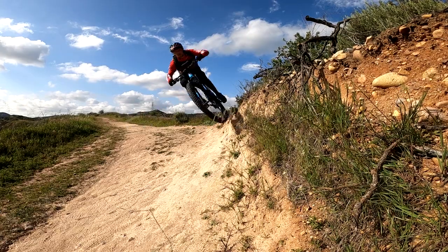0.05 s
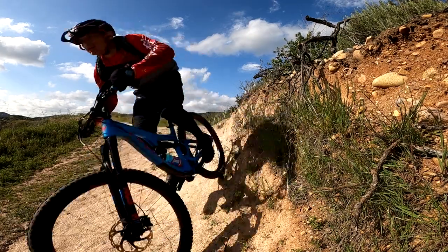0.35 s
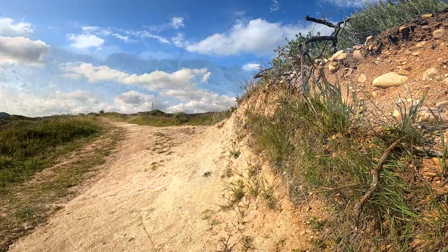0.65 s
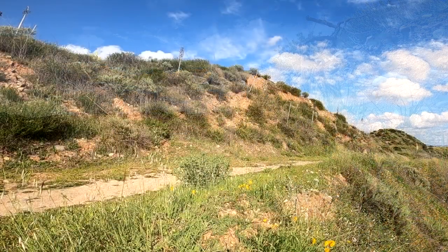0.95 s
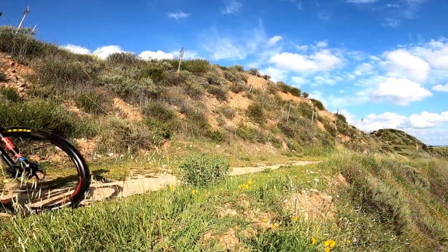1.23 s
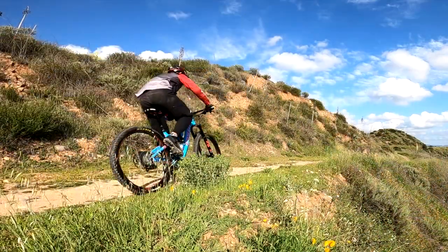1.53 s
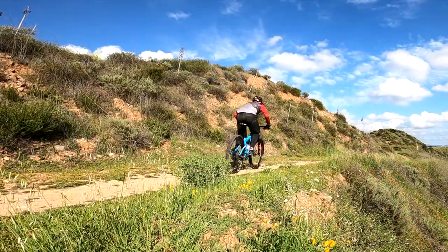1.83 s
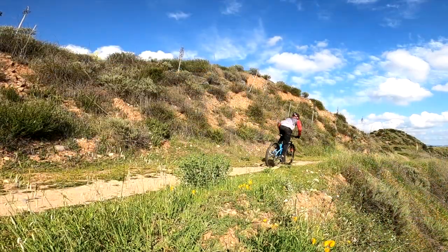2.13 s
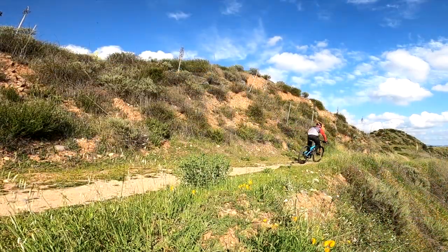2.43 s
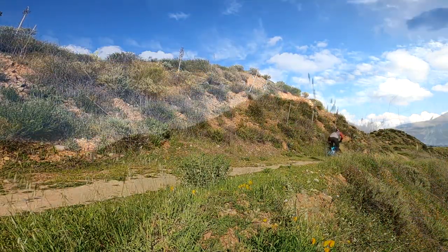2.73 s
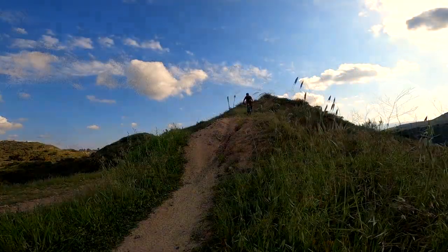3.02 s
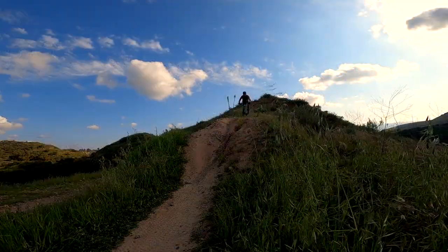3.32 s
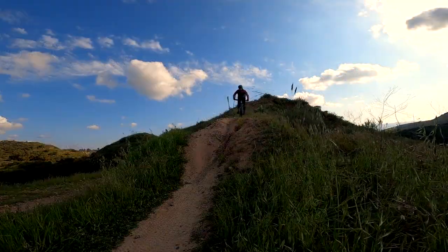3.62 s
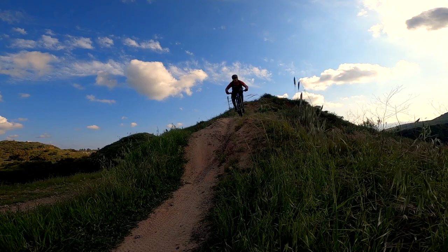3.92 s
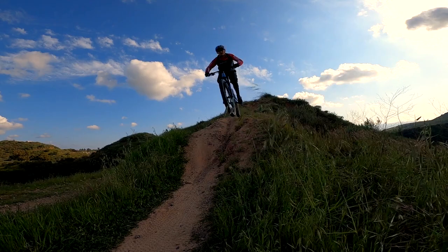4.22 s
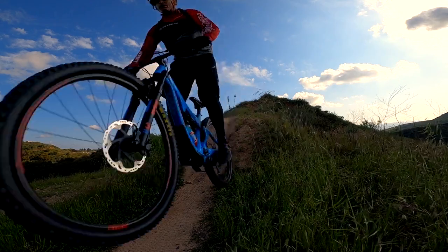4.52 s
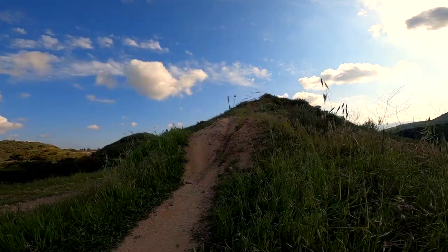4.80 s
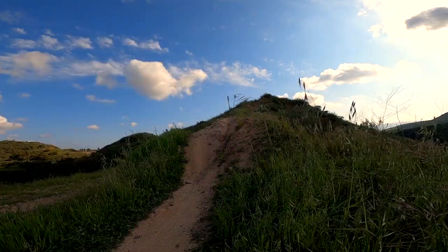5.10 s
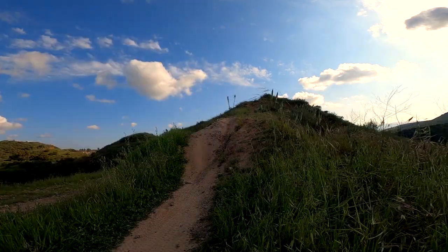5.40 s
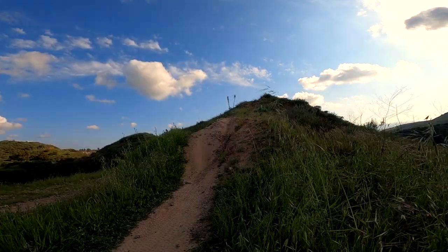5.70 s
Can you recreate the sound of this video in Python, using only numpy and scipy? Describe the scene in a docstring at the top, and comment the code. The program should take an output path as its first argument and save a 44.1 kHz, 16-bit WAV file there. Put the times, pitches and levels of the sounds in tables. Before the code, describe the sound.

Bike tyres rumble and crunch over dry dirt in three close passes, two thumping down from jumps, as wind buffets the microphone.

```python
"""A dry dirt trail in open hills: mountain bikes pass close by three times. Two jump and land
beside the microphone, one rolls past. Knobby tyres rumble and crush grit, swelling as they near,
lighter in hops and harder on bumps, with a bright whirr and a wavering low hum. Landings thump,
stones snap, hard jolts clink and slipping knobs spray dirt. Wind buffets the microphone, mostly
while the last rider is still far away."""
import sys
import numpy as np
from scipy import signal
from scipy.io import wavfile
from scipy.ndimage import uniform_filter1d, map_coordinates

SR = 44100
rng = np.random.default_rng(int(sys.argv[2]) if len(sys.argv) > 2 else 0)


def digitize_waveform(pressure):
    """Quantize a signal to 16-bit integers and store it at the path in sys.argv[1].

    Rows of a 2-D input are taken as channels; values are limited to [-1, 1].
    """
    field = np.atleast_2d(pressure).T
    bounded = np.clip(field, -1, 1)
    quanta = np.round(bounded * 32767).astype(np.int16)
    wavfile.write(sys.argv[1], SR, quanta)


N = 253575
TIME = np.arange(N) / SR
SIDES = np.array([[1], [-1]])  # left, right
METAL_CYCLES = 124  # a metallic ring dies by 60 dB in this many cycles
LAYERS = ("crunch", "dust", "rumble", "roar", "whirr")

# Pass-bys: start t/s, closest t/s, distance/m, then closest level/dB for each of LAYERS
PASSES = [(0, 0.56, 0.46, -27, -34.5, -22, -25.5, -58), (0.872, 1.25, 1.54, -37, -44.5, -36, -39.5, -41),
          (2.896, 4.765, 0.33, -22.5, -28.5, -19, -16, -34.5)]
# The bike's stereo position: t/s, left over right/dB, width/0-1
PAN_PATH = [(0.68, 3, 0.36), (.86, 9.5, 0.73), (1.25, 11.5, 0.4), (1.48, 6.5, 0.4), (1.8, 1.1, 0.29),
            (3.5, -1, 0.46), (4.2, 0, 0)]
# Brief dips in the tyre sound, in hops or under a wind buffet: start t/s, end t/s, dip/dB
DIPS = [(-0.05, 0.341, 16.5), (0.37, 0.478, 15), (0.731, 0.89, 3.5), (2.48, 2.883, 2), (3.062, 3.392, 1.5),
        (3.52, 3.87, 3.5), (4.242, 4.624, 10), (4.62, 4.73, 2.5), (5.234, 5.428, 10)]
# Landings and rough ground load the tyres: t/s, crunch boost/dB, drumming boost/dB, length/s
BUMPS = [(0.499, 7, -6, 0.023), (0.662, 3.5, 2.5, 0.066), (1.185, -3, 8, 0.13), (1.31, -2, 9, 0.18),
         (1.505, 7.5, 8.5, 0.11), (1.68, 8, 5, 0.19), (2.182, 7, 2.5, 0.6), (2.903, -1, 4.5, 0.26),
         (3.385, 2.5, -0.5, 0.17), (4.615, 6.5, 7.5, 0.057), (4.938, -7.5, 2.5, 0.57), (5.66, 0, 6.5, 0.59)]

# Tone curve of the hill air: f/Hz, level/dB
AIR_EQ = [(25, 8), (420, -4), (800, -30.5), (2000, -23), (7000, -29.5), (10000, -47), (15000, -67)]
# Tone curve of crushed grit: f/Hz, level/dB
GRIT_EQ = [(500, -3), (1300, 4.5), (2200, 2), (3300, -3), (4500, -15.5), (6000, -26.5), (9000, -46.5)]
# Tone curve of fine dust: f/Hz, level/dB
DUST_EQ = [(3100, 6), (4200, 6), (5700, 1), (7200, -4.5), (9100, -16), (11500, -20), (14500, -26.5)]
# Tone curve of the tyres' low end: f/Hz, level/dB
RUMBLE_EQ = [(20, -7), (40, -5), (80, 0), (130, -5.5), (190, -4), (370, -28)]
# Tone curve of the tread's hollow roar: f/Hz, level/dB
ROAR_EQ = [(130, -23.5), (180, -4.5), (290, 2.5), (380, -1), (480, 0), (650, -5), (900, -9.5),
           (2300, -23.5)]
# Tone curve of the gusts: f/Hz, level/dB
GUST_EQ = [(18, 5), (35, 5.5), (70, 2.5), (200, -11.5), (340, -43), (900, -76.5)]

# Swells and fades of the low hum: t/s, level/dB
HUM_LEVEL = [(0, -42.5), (0.25, -69), (0.4, -33.5), (0.56, -37), (0.83, -36.5), (0.92, -44), (1.33, -35),
             (1.5, -45.5), (2.8, -54.5), (3, -40.5), (4.1, -40.5), (4.5, -48), (4.9, -26), (5.13, -37),
             (5.23, -31), (5.35, -41), (5.75, -33.5)]
# Pitch glide of that hum: t/s, f/Hz
HUM_PITCH = [(0.48, 266), (0.6, 246), (0.77, 296), (0.84, 256), (1.02, 296), (1.12, 252), (1.32, 294),
             (1.65, 258), (5.25, 251)]
# The two bright bands of the whirr: f/Hz, bandwidth/Hz, level/dB
WHIRR_BANDS = [(2830, 1000, -0.5), (7000, 730, -7)]
# Single eddies on the microphone: peak t/s, level/dB, cutoff f/Hz, length/s
EDDIES = [(0.294, -27, 108, 0.032), (1.858, -28.5, 70.5, 0.05), (3.201, -14, 152, 0.049),
          (3.412, -9.5, 133, 0.025), (3.496, -12.5, 222, 0.063), (3.605, -10, 304, 0.022),
          (3.699, -6.5, 416, 0.03), (3.947, -14, 234, 0.049)]
# Gusts on the microphone: peak t/s, level/dB, length/s
GUSTS = [(3.569, -17, 0.75), (4.318, -21.5, 0.17), (5.137, -30, 0.076)]
# Sudden bursts of grit: knobs tearing dirt loose up close, and dull scuffs and knocks of the bike still far
# off: peak t/s, level/dB, brightness f/Hz, length/s
SPRAYS = [(0.366, -37, 1540, 0.085), (0.513, -28, 6000, 0.055), (0.667, -31, 5500, 0.014),
          (0.695, -22, 6000, 0.0064), (0.812, -30.5, 2600, 0.03), (0.881, -32.5, 2840, 0.023),
          (1.203, -31.5, 2300, 0.058), (2.211, -36, 2570, 0.047), (2.299, -44, 2800, 0.14),
          (2.824, -46, 2900, 0.027), (3.044, -36, 1050, 0.036), (3.233, -37, 1200, 0.039),
          (3.338, -36.5, 1560, 0.014), (3.39, -36, 1170, 0.034), (3.462, -41.5, 1000, 0.33),
          (4.162, -48.5, 2800, 0.31), (4.676, -18.5, 5140, 0.01), (4.739, -21.5, 4860, 0.048),
          (4.758, -16, 2940, 0.027)]
# Wheels hitting the ground: t/s, thump drive/dB, crack drive/dB
LANDINGS = [(0.474, -17, -28), (0.51, -8, -13), (4.616, -11, -7), (4.718, -3.5, 0), (4.791, -15, -19)]
# Tyre and ground ringing after a blow: f/Hz, level/dB, t60/s
THUMP_MODES = [(67, 6, 0.071), (131, -5.5, 0.044), (291, -2.5, 0.044), (432, -3, 0.032)]
# Stones, chain and suspension knocking on the bike: t/s, level/dB, f/Hz
CLACKS = [(0.691, -15, 4200), (0.6965, -9.5, 2200), (0.7137, -12.5, 1700), (1.2653, -11, 1800),
          (1.3488, -14, 3060), (1.4655, -14, 2380), (1.4717, -14, 2370), (1.5005, -19, 3900),
          (1.5377, -14.5, 1780), (1.732, -18, 1410), (2.184, -31, 2580), (2.992, -28, 740),
          (3.443, -26.5, 860), (3.997, -23.5, 2300), (4.6268, -11, 2600), (4.719, -4.5, 1590),
          (4.7643, -5.5, 1860), (4.796, -7, 370), (5.389, -24.5, 380), (5.4333, -32, 1111)]
# Short, bright ringing clinks on hard jolts: t/s, level/dB, f/Hz
CLINKS = [(0.691, -21.5, 7280), (2.803, -48, 10660), (4.644, -14, 3120), (4.6764, -27, 7300),
          (4.677, -18.5, 2560)]


def from_db(db):
    """Decibels to gain."""
    return 10 ** (np.asarray(db) / 20)


def rms_one(x):
    """Scale to unit power."""
    return x / np.sqrt(np.mean(x ** 2) + 1e-20)


def automation(rows):
    """Each column of a timed curve at every sample."""
    times, *columns = np.transpose(rows)
    return [np.interp(TIME, times, column) for column in columns]


def butter(x, hz, kind, order=2):
    """Causal Butterworth filter."""
    sections = signal.butter(order, np.clip(hz, 10, .45 * SR), kind, fs=SR, output="sos")
    return signal.sosfilt(sections, x + 1e-18)


def white():
    """A pair of unrelated white noises."""
    return rng.standard_normal((2, N))


def drift(hz):
    """A smooth random wobble, rms about 1."""
    step = 40  # samples per control point
    pole = np.exp(-2 * np.pi * hz * step / SR)
    noise = rng.standard_normal(N // step + 2002)
    slow = signal.lfilter([1], [1, -2 * pole, pole * pole], noise)[2000:]
    return np.interp(np.arange(N) / step, np.arange(len(slow)), rms_one(slow))


def steady(x, samples):
    """Ride the level flat over a window and keep the finer texture."""
    power = np.atleast_2d(x ** 2).mean(0)
    smooth = uniform_filter1d(uniform_filter1d(power, samples), samples)
    return x / np.sqrt(np.abs(smooth) + 1e-12)


def ring(x, hz, t60):
    """A resonator: a unit click starts a decaying sine of height 1."""
    pole, angle = from_db(-60 / (t60 * SR)), 2 * np.pi * hz / SR
    feedback = [1, -2 * pole * np.cos(angle), pole * pole]
    return signal.lfilter([0, pole * np.sin(angle)], feedback, x + 1e-18)


def bell(peak_s, length, lean=1):
    """A smooth rise to 1 and a fall; lean is rise time over fall time."""
    width = length * np.where(TIME < peak_s, lean, 1)
    return np.exp(-np.minimum((2 * (TIME - peak_s) / width) ** 2, 50))


def swell(noise, peak_s, length, lean=1):
    """A burst of the noise with rms 1 at its height."""
    shape = bell(peak_s, length, lean)
    power = np.sum(np.mean(noise ** 2, 0) * shape ** 2) / np.sum(shape ** 2)
    return noise * shape / np.sqrt(power)


def coloured(eq, excite):
    """Third-octave bands on a tone curve, each driven by a fresh call of excite; rms 1."""
    hz, db = np.transpose(eq)
    edges = 16 * 2 ** (np.arange(31) / 3)
    out = 0
    for low, high in zip(edges, edges[1:]):
        centre = np.sqrt(low * high)
        if hz[0] <= centre <= hz[-1]:
            gain = from_db(np.interp(np.log(centre), np.log(hz), db))
            out = out + gain * butter(excite(), [low, high], "band", order=3)
    return rms_one(out)


def scatter(per_s, size_db, cap=np.pi):
    """Random clicks, many small and a few big, spanning cap times size_db."""
    hits = rng.random(N) < per_s / SR
    return hits * from_db(size_db * np.minimum(rng.exponential(1, N), cap))


def panned(pair, spread=1, lag_s=0.00014):
    """Mid and side to left and right, following the bike in level and, off centre, in delay."""
    mid, side = pair
    pan_db, width = automation(PAN_PATH)
    width = spread * np.clip(width, 0, 1)
    gains = from_db(SIDES * spread * pan_db / 2)
    left, right = gains / gains.mean(0) * (mid + SIDES * width * side)
    aside = spread * pan_db / np.abs(pan_db).max()
    read_at = (TIME - lag_s * aside * np.abs(aside)) * SR
    return np.array([map_coordinates(left, [read_at], order=3, mode="nearest"), right])


def pass_by(layer, falloff, behind_db, speed_m_per_s=6.97, crossfade_s=0.024):
    """A layer's level in dB: it falls with a power of distance and differs ahead and behind."""
    out = np.zeros(N)
    for start, closest, distance, *levels in PASSES:
        along = speed_m_per_s * (TIME - closest)
        away = np.hypot(along, distance)
        loss_db = falloff * 20 * np.log10(away / distance)
        db = levels[LAYERS.index(layer)] - loss_db + behind_db * along / away
        out += (db - out) * np.clip((TIME - start) / crossfade_s + 1, 0, 1)
    return out


def tyre_faders(dip_curve=0.33, recover_s=0.014, attack_s=0.0017):
    """Crunch and drumming in dB: they dip in hops or under a wind buffet and jump at bumps."""
    dips_db = np.zeros(N)
    for start, end, dip_db in DIPS:
        depth = np.clip((TIME - start) / (end - start), 0, 1) ** dip_curve
        dips_db -= dip_db * depth * np.clip((end - TIME) / recover_s, 0, 1)
    crunching, drumming = dips_db.copy(), dips_db.copy()
    for t, crunch_db, drum_db, length in BUMPS:
        push = np.clip((TIME - t) / attack_s, 0, 1) * bell(t, 2 * length)
        crunching += crunch_db * push
        drumming += drum_db * push
    return crunching, drumming


def hill_air():
    """A faint bed of open air under the whole scene."""
    return from_db(-52.5) * panned(coloured(AIR_EQ, white), spread=0.88)


def grains(eq, per_s, size_db, colour_db, pressure):
    """Grains break under the tread, each with its own size and colour; mid and side."""
    sizes = scatter(per_s, size_db, cap=5) * pressure
    at = np.flatnonzero(sizes)

    def cracks():
        """The same clicks, weighted afresh for one band."""
        clicks = np.zeros((2, N))
        chance = rng.standard_normal((2, 2 ** 15))[:, at % 2 ** 15]
        clicks[:, at] = sizes[at] * np.sign(chance) * from_db(colour_db * np.abs(chance))
        return clicks
    return steady(coloured(eq, cracks), samples=3600)


def clods(per_s=20, t60=0.07):
    """Envelope of clods giving way at random: a hard attack, then a quick crumble."""
    breaks = (rng.random(N) < per_s / SR) * rng.uniform(0.44, 1, N)
    return signal.lfilter([1], [1, -from_db(-60 / (t60 * SR))], breaks + 1e-18)


def pebbles(ring_cycles=20):
    """Loose pebbles click together under the tread, each on its own pitch; mid and side."""
    hits = scatter(per_s=130, size_db=3.0)
    pitches_hz = np.geomspace(800, 3700, 14)
    pick = rng.integers(0, len(pitches_hz), N)
    hits = hits * rng.choice([-1, 1], (2, N))
    return sum(ring(hits * (pick == k), hz, ring_cycles / hz) for k, hz in enumerate(pitches_hz))


def tyre_crunch(dense_db=-33, dust_width=1.72):
    """Knobs bite in clumps, crush grit and dust and flick pebbles; up close the crunch is dense."""
    fader_db, _ = tyre_faders()
    crunch_db = pass_by("crunch", falloff=0.96, behind_db=-2.5) + fader_db
    dust_db = pass_by("dust", falloff=1.27, behind_db=-1.5) + 1.05 * fader_db
    sparse = 1 / (1 + from_db(crunch_db - dense_db))  # single clods stand out of a quiet crunch
    flutter = from_db(2.53 * drift(53) + drift(34))
    pressure = flutter * (1 + 1.53 * np.sqrt(sparse) * clods())
    grit = grains(GRIT_EQ, per_s=3200, size_db=3.0, colour_db=3.5, pressure=pressure)
    crunch = rms_one(grit + from_db(3) * pebbles())
    dust = grains(DUST_EQ, per_s=8000, size_db=2.5, colour_db=-3.5, pressure=pressure ** 0.71)
    return panned(from_db(crunch_db) * crunch + from_db(dust_db) * dust * [[1], [dust_width]])


def tyre_roll():
    """The tread drums on packed earth: a deep rumble and a hollow roar."""
    _, fader_db = tyre_faders()
    rumble_db = pass_by("rumble", falloff=0.93, behind_db=0) + 0.81 * fader_db
    rumble = from_db(rumble_db) * steady(coloured(RUMBLE_EQ, white), samples=2600)
    roar_db = pass_by("roar", falloff=0.98, behind_db=1.3) + 0.92 * fader_db
    flutter = from_db(1.96 * drift(29))
    roar = from_db(roar_db) * grains(ROAR_EQ, per_s=1400, size_db=3.0, colour_db=3.5, pressure=flutter)
    return panned(rumble + roar, spread=0.22)


def low_hum(waver_hz=6):
    """A narrow, wavering low hum near 260 Hz that swells and fades."""
    [hum_db], [hum_hz] = automation(HUM_LEVEL), automation(HUM_PITCH)
    waver = drift(waver_hz) + 1j * drift(waver_hz)
    carrier = np.exp(2j * np.pi * np.cumsum(hum_hz) / SR)
    hum = from_db(hum_db) * steady(np.real(waver * carrier), samples=4500)
    return panned([hum, hum], spread=0.22)


def whirr():
    """A bright, fluttering whirr in two bands, near 3 and 7 kHz, swells as each bike passes."""
    whirr_db = pass_by("whirr", falloff=1.6, behind_db=-4.5)
    flutter = white() * from_db(4.3 * drift(180))
    bands = sum(from_db(db) * rms_one(butter(flutter, [hz - width / 2, hz + width / 2], "band"))
                for hz, width, db in WHIRR_BANDS)
    return panned(from_db(whirr_db) * bands, spread=0.66)


def wind():
    """Turbulence hits each microphone port differently; faster eddies sound brighter."""
    gusts = sum(from_db(db) * bell(t, length) for t, db, length in GUSTS)
    flow = gusts * from_db(2.4 * drift(31)) * steady(coloured(GUST_EQ, white), samples=3000)
    air = butter(white(), 16.4, "high")
    for t, db, hz, length in EDDIES:
        eddy = steady(butter(air, hz, "low", order=4), samples=900)
        flow += from_db(db) * swell(eddy, t, length)
    return flow


def dirt_sprays(fines_db=-17, sizzle_db=-19):
    """Sudden bursts of grit: slipping knobs throw sprays of dirt, and the far bike scuffs and knocks; separate
    crumbs in a haze of fines."""
    crumbs = scatter(per_s=3200, size_db=5.0)
    dirt = white() * (crumbs + from_db(fines_db))
    sprays = np.zeros((2, N))
    for t, db, hz, length in SPRAYS:
        band = butter(dirt, [hz / 7.6, hz * 1.38], "band")
        sprays += from_db(db) * swell(band, t, length, lean=0.15)
    return panned(butter(sprays, 7570, "low", order=4) + from_db(sizzle_db) * sprays)


def landings(crack_t60=0.012, crack_gain_db=11):
    """Each wheel thumps softly into the ground and cracks the crust."""
    blows, crust = np.zeros(N), np.zeros(N)
    for t, thump_db, crack_db in LANDINGS:
        blows[round(t * SR)] = -from_db(thump_db)
        crust += from_db(crack_db - 60 * np.clip((TIME - t) / crack_t60, 0, 3)) * (TIME >= t)
    thump = sum(from_db(db) * ring(blows, hz, t60) for hz, db, t60 in THUMP_MODES)
    crack = from_db(crack_gain_db) * butter(crust * white(), [200, 1900], "band", order=3)
    return butter(thump, [30, 1100], "band", order=1) + panned(crack)


def clacks(rattle_cycles=22, rattle_db=-19, frame_db=-8, metal_db=-18):
    """Knocks on the bike: a pitched tick and rattle, a dull frame, a faint ring; low ones last longer."""
    age = np.arange(16384) / SR
    out = np.zeros((2, N + len(age)))
    for t, db, hz in CLACKS:
        snap = from_db(rattle_db - 60 * age * hz / rattle_cycles) * rng.standard_normal((2, len(age)))
        snap[0, 0] += 1  # the tick, in the mid channel only
        frame = from_db(frame_db) * butter(snap, [350, 1300], "band")
        clack = butter(snap, [hz / 1.35, hz * 1.35], "band") + frame
        metal = ring(snap, hz, METAL_CYCLES / hz)
        hit = clack / np.abs(clack).max() + from_db(metal_db) * metal / np.abs(metal).max()
        at = round(t * SR)
        out[:, at:at + len(age)] += from_db(db) * hit
    return panned(out[:, :N])


def clinks(chatter_t60=0.01):
    """Short, bright clinks on hard jolts: an instant of chatter with a ringing tail."""
    out = np.zeros((2, N))
    for t, db, hz in CLINKS:
        chatter = (TIME >= t) * from_db(-60 * np.clip((TIME - t) / chatter_t60, 0, 3))
        tone = ring(chatter * white(), hz, METAL_CYCLES / hz)
        out += from_db(db) * tone / np.abs(tone).max(1, keepdims=True)
    return panned(out)


def scene():
    """The mix: air bed, pass-by layers, hum, spot hits and wind."""
    return (hill_air() + tyre_crunch() + tyre_roll() + low_hum() + whirr()
            + landings() + clacks() + clinks() + dirt_sprays() + wind())


def record(dry, ceiling=0.97, cutoff_hz=15700):
    """A soft clip rounds the highest peaks and a steep low-pass trims the top."""
    rounded = dry / (1 + (dry / ceiling) ** 4) ** (1 / 4)
    return signal.sosfilt(signal.ellip(10, .1, 90, cutoff_hz, fs=SR, output="sos"), rounded)


dry = scene()
out = record(dry)
digitize_waveform(out)
```